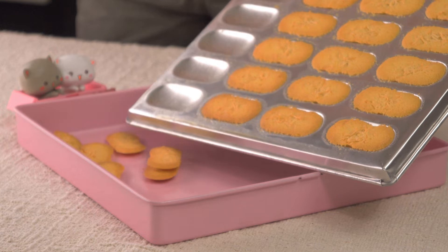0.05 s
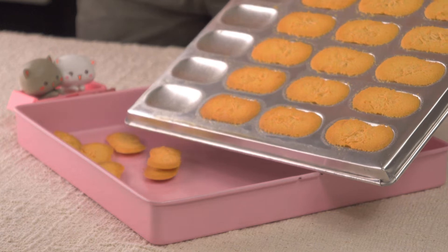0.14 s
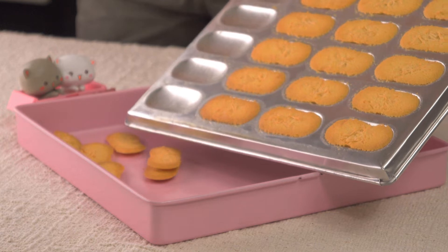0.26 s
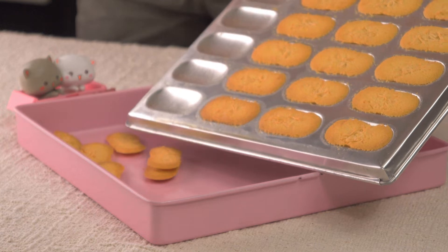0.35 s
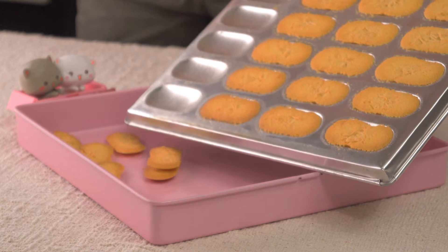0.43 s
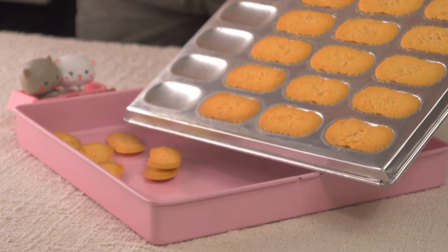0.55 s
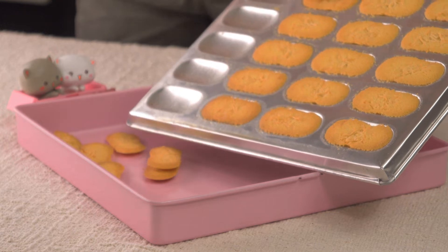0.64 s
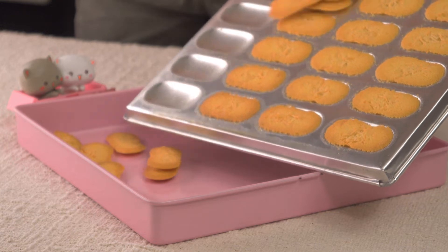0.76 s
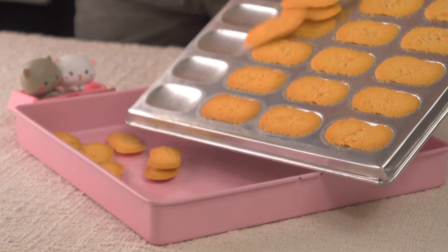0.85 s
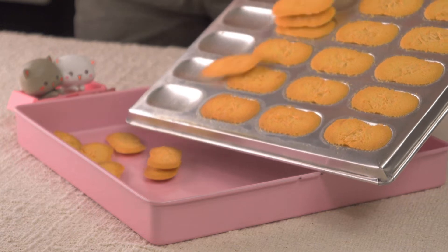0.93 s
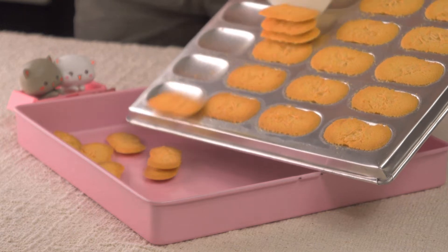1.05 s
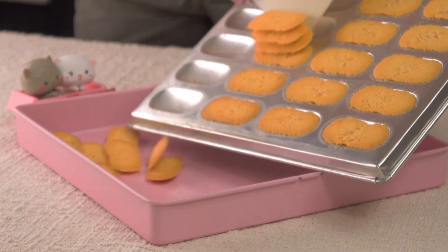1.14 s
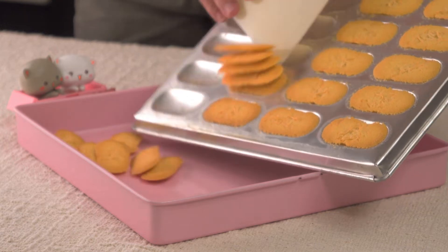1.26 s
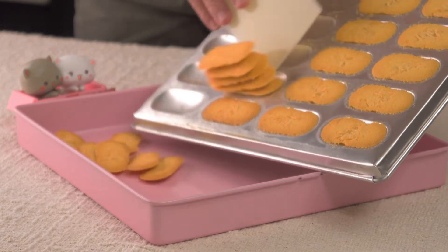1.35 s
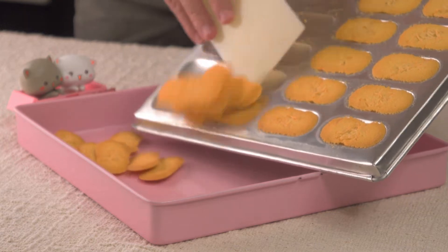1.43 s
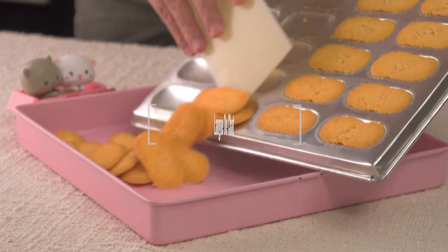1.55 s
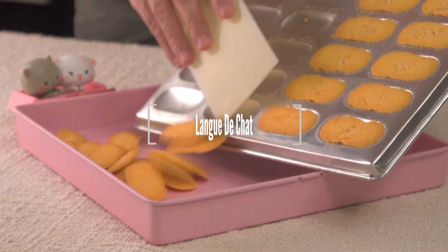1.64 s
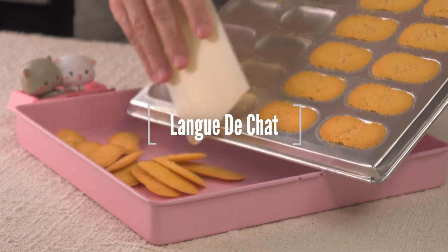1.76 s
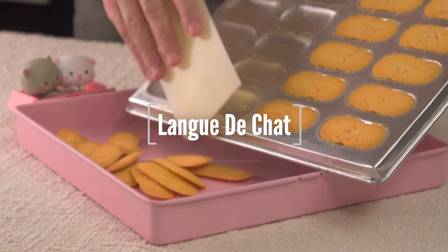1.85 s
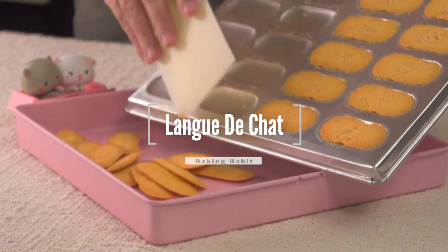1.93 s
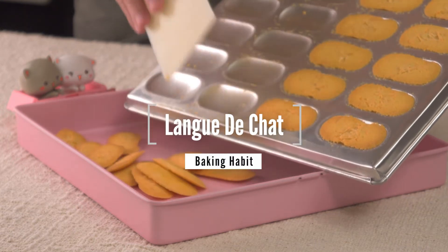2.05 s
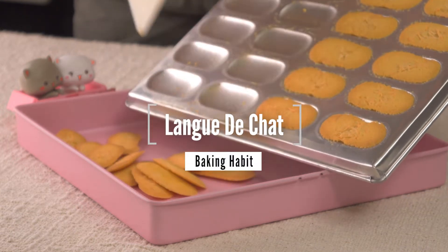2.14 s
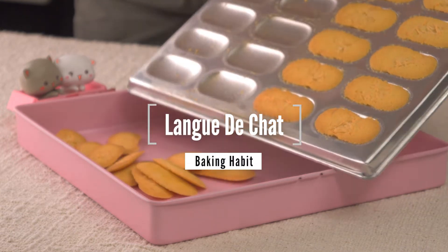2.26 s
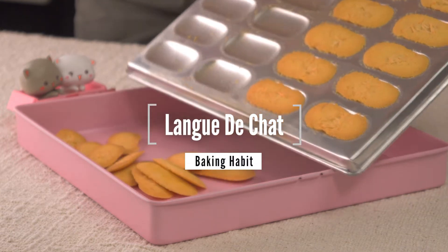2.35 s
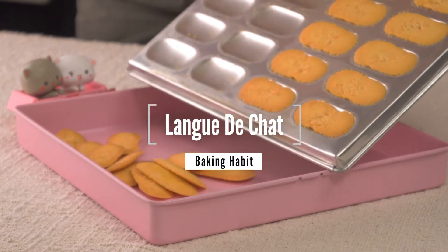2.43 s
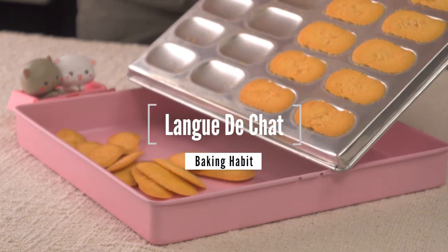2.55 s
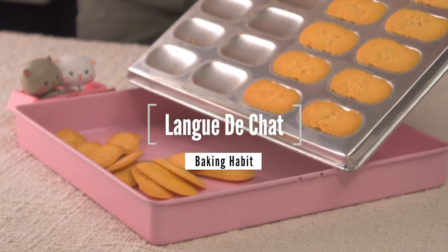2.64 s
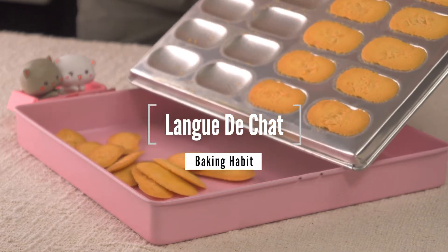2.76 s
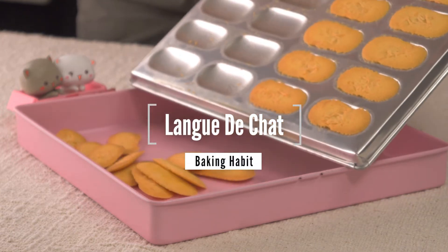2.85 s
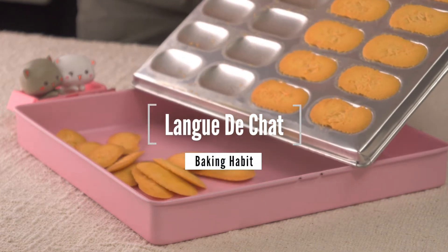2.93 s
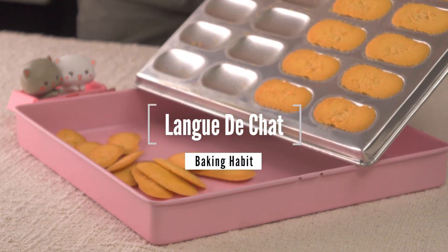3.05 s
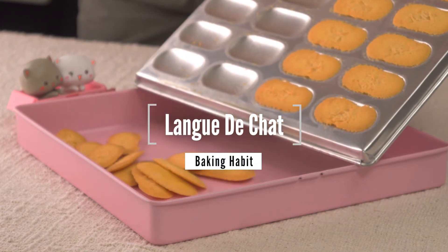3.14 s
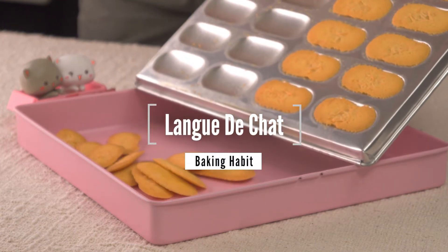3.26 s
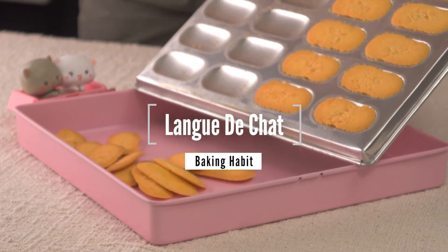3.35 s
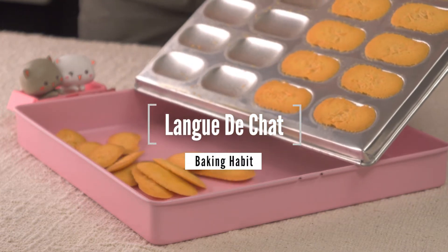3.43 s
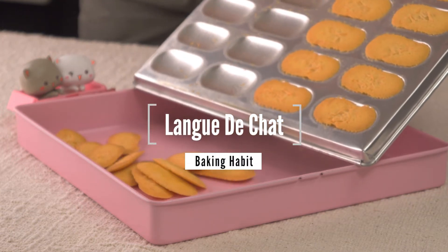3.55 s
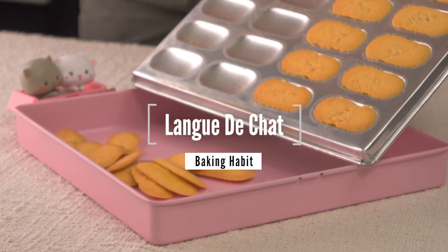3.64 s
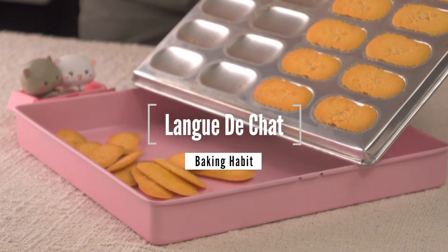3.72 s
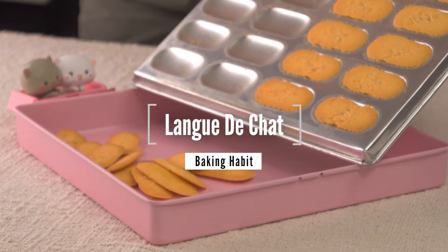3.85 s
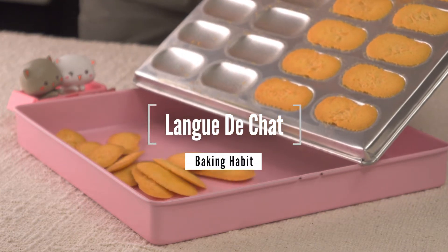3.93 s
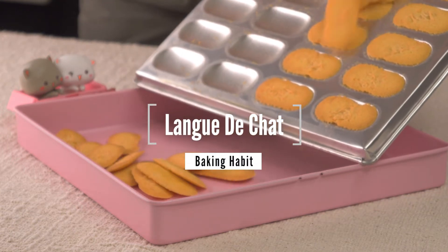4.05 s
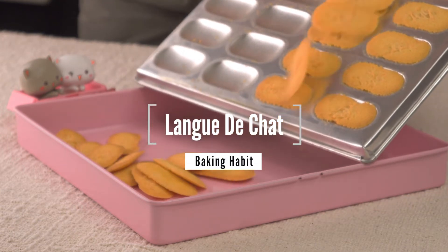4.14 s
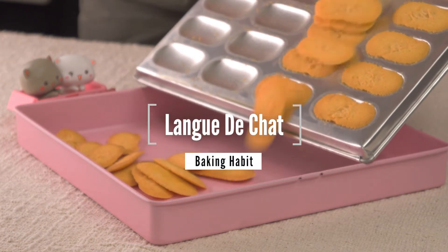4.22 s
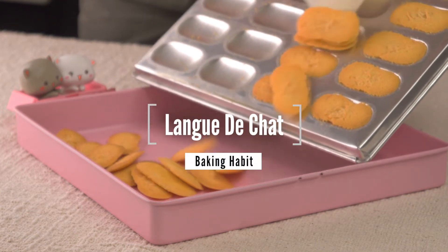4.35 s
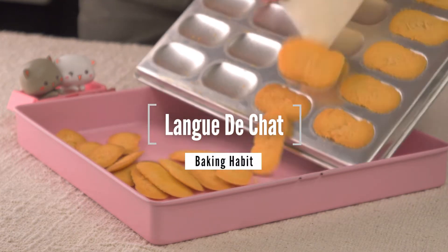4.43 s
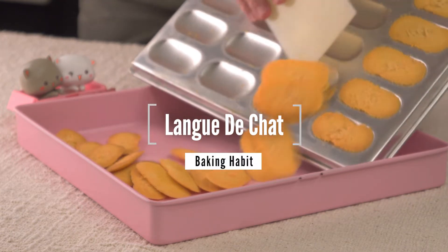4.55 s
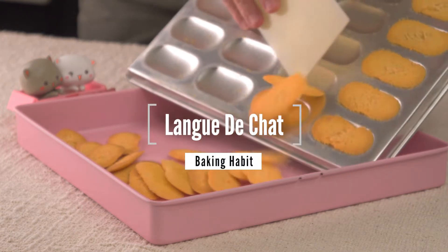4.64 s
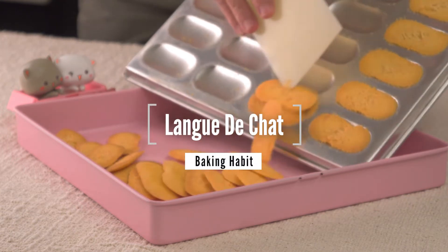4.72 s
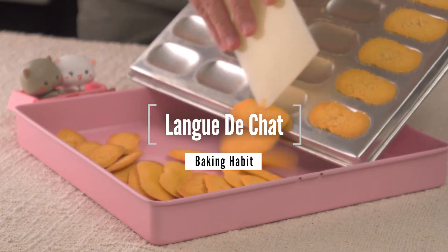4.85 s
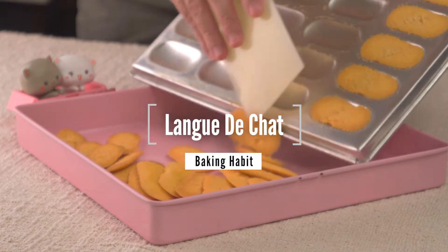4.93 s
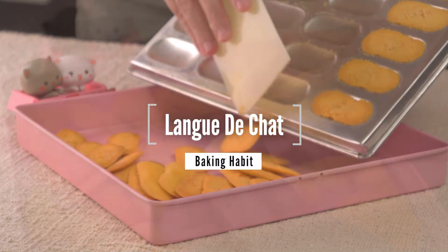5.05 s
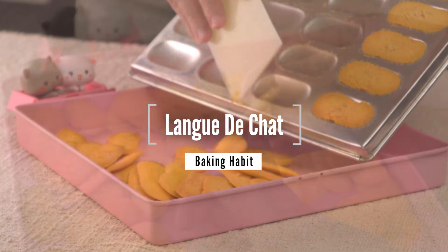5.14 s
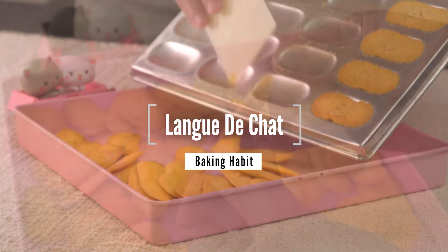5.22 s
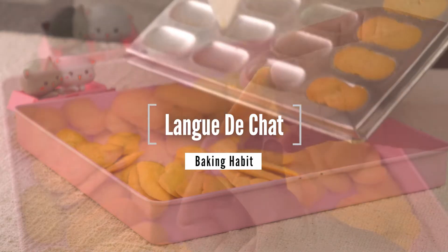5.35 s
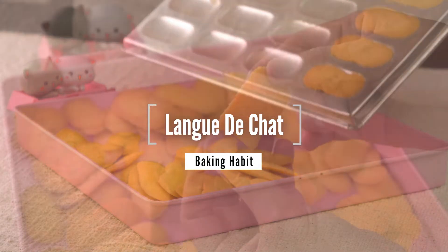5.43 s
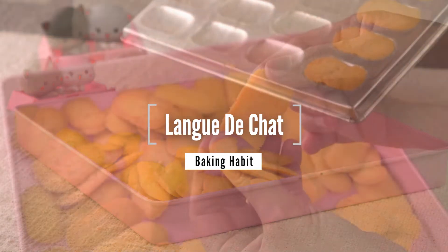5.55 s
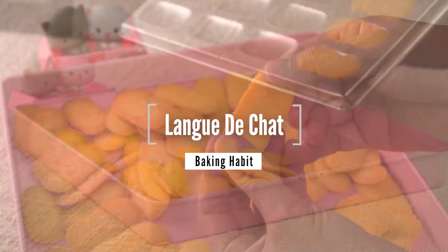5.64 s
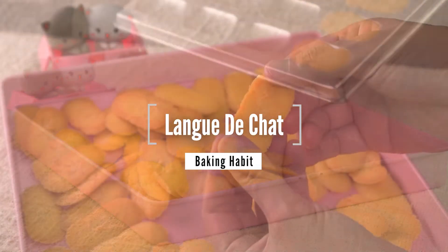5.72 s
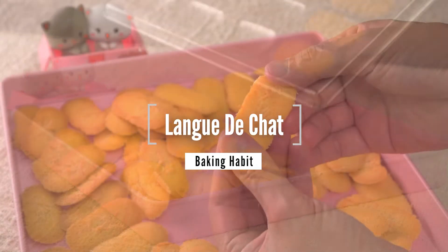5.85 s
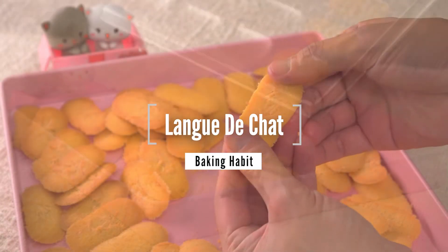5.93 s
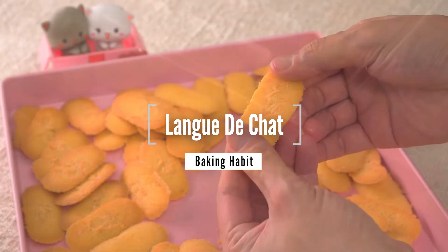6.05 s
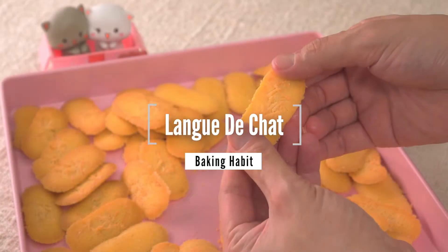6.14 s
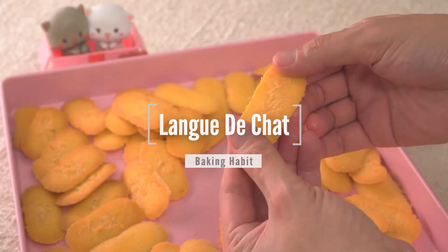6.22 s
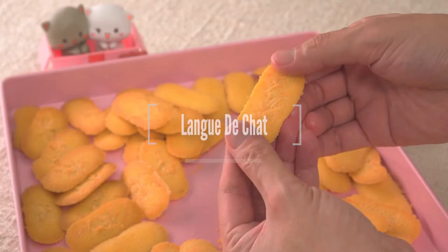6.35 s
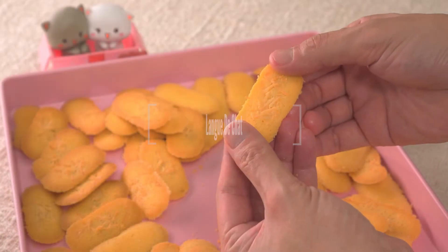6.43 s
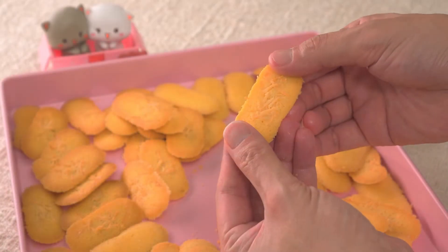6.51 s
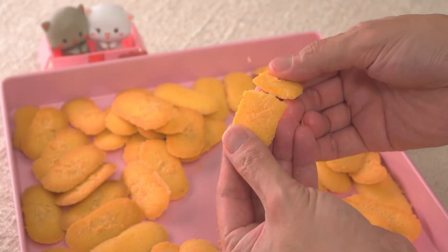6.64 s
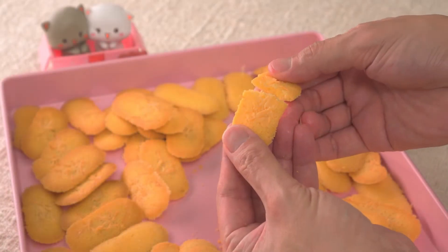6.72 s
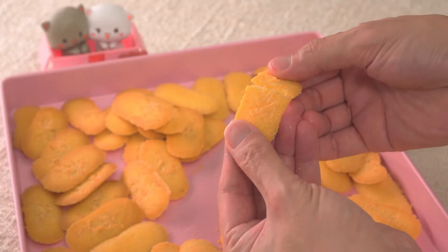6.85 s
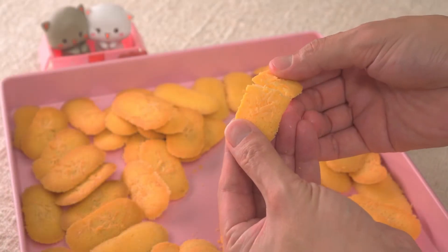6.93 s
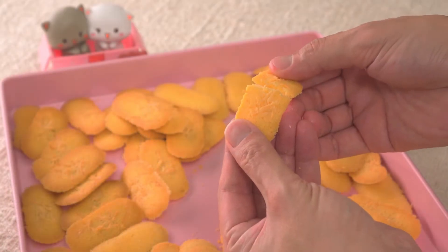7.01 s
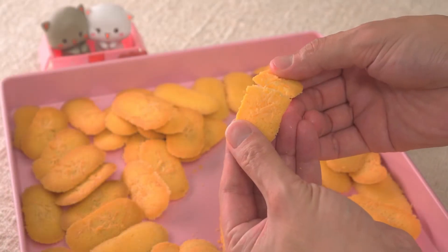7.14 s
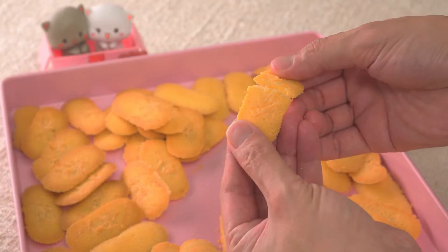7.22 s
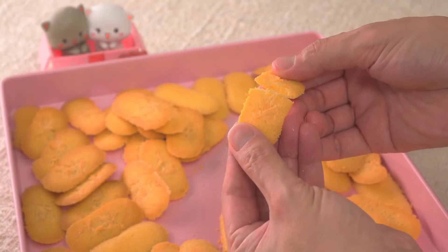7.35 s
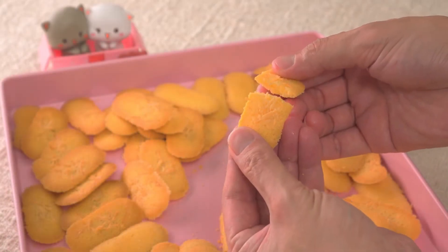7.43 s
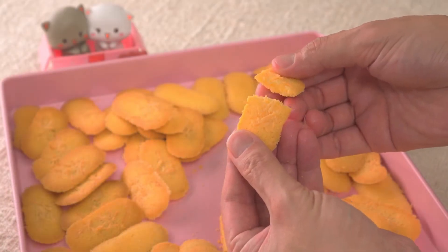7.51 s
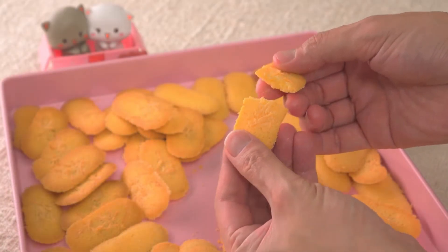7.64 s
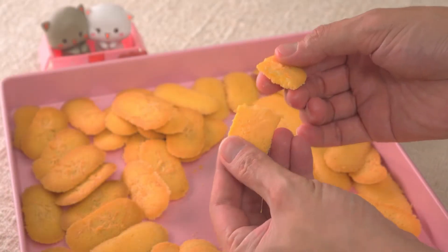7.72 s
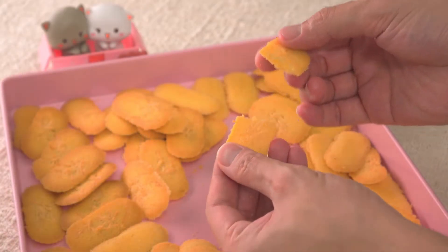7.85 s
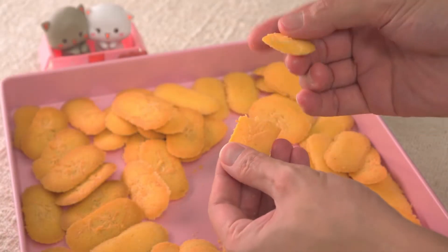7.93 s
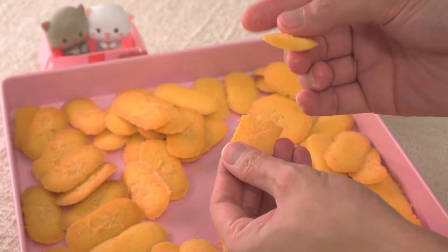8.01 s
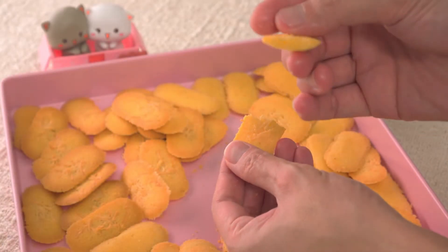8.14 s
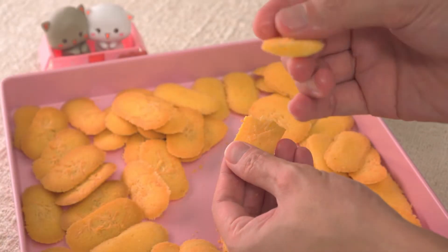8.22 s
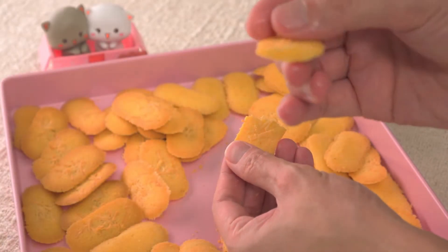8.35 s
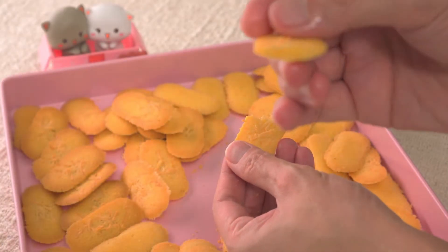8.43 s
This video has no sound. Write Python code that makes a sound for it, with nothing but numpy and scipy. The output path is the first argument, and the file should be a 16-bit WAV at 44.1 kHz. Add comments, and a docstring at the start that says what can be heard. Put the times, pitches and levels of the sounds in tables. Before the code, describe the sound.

A quiet room with soft low noise and a faint mains hum, heard close up. From about 0.1 s a plastic scraper makes light, gritty strokes over crisp cookies in a thin metal mould, with small knocks. The scraping strengthens around 1 s, with a bright clack near 1.1 s, rasping strokes, rattling and soft thuds into a plastic tray, then sharp metallic clacks around 1.7 s. It quiets by 2 s. A short resonant scuff at 2.3 s, a small knock and thud, and two fainter rubs until 3.1 s are the mould shifting on the rim. Scraping resumes near 3.4 s and grows denser from 4 to 5 s, with the hardest clack at 4.35 s and a fuller thud at 4.55 s. Loose ticks settle by 5.3 s. After near silence, a cookie snaps at 6.6 s: a thin, dry, crumbly crack, followed by calm and barely audible crumbs.

```python
"""A plastic scraper rasps over thin baked cookies, pushing them out of a tilted sheet-metal mould in two rounds.
Cookies knock, clack on the ringing metal and thud into a plastic tray; at the end one is snapped in two.
Between the rounds the mould slides on the tray's rim; a low hum and room noise lie beneath.
Rubbing is uneven slips in noise, coloured by spectra and resonances; blows are decaying bursts of
coloured noise, and the metal's ring is noise around its modes. A short room tail answers it all."""
import sys
import numpy as np
from scipy import signal
from scipy.fft import rfft, irfft, next_fast_len
from scipy.io import wavfile
from scipy.ndimage import uniform_filter1d, map_coordinates

SR = 44100
rng = np.random.default_rng(int(sys.argv[2]) if len(sys.argv) > 2 else 0)


def log_audio(samples):
    """Write samples as a 16-bit WAV file to the path given in sys.argv[1]."""
    # one column per channel
    frames = np.atleast_2d(samples).T
    # limit to full scale, then quantise
    limited = np.clip(frames, -1, 1)
    pcm = np.round(limited * 32767).astype(np.int16)
    wavfile.write(sys.argv[1], SR, pcm)


N = 373815
TIME = np.arange(N) / SR  # the whole scene, s
AGE = np.arange(SR // 2) / SR  # time since a contact, s

# spectrum of a hard contact with the metal: (frequency [Hz], level [dB])
CLACK_SPECTRUM = [(500, -37.5), (1200, -11), (2000, -8), (2700, -1.5), (3400, -5), (5000, -8),
                  (6500, -22.5), (10000, -27), (16000, -45.5)]
# spectrum of a dull blow of a cookie: (frequency [Hz], level [dB])
KNOCK_SPECTRUM = [(40, -36.5), (130, -7.5), (260, -13.5), (420, -5), (680, 1.5), (1000, -8), (1600, -17.5),
                  (4000, -57)]
# spectrum of breaking crust: (frequency [Hz], level [dB])
CRUMB_SPECTRUM = [(2000, -38), (5000, -1.5), (7500, 4.5), (10000, -2.5), (12000, -9.5), (16000, -12)]
# strokes of the scraper: (start [s], length [s], level at the bite [dB], crust hiss against the rasp [dB])
STROKES = [(0.154, .03, -49.5, -14), (0.196, 0.18, -33.5, -12), (0.498, 0.18, -46, -6),
           (0.747, 0.19, -44, -7.5), (0.97, 0.18, -31.5, -12.5), (1.179, .12, -29, -13),
           (1.363, 0.1, -31.5, -9.5), (1.547, 0.12, -30, -3.5), (1.697, 0.15, -40, -9.5),
           (3.374, .03, -51, -10.5), (3.413, .17, -42, -8), (3.708, 0.13, -50, -2.5),
           (3.956, 0.1, -43, -2.5), (4.136, 0.21, -35.5, -10), (4.336, 0.18, -39, -8.5),
           (4.541, 0.21, -28, -10.5), (4.748, 0.19, -29, -8), (4.923, 0.08, -36.5, -14.5),
           (5.545, 0.036, -69, 0.5)]

STIR_DB_PER_S = 147  # how quickly the jostling of loose cookies builds up
RUN_OUT_DB_PER_S = 299.5  # release of a stroke


def amp(db):
    """Decibels to gain."""
    return 10 ** (np.asarray(db) / 20)


def unit(x):
    """Scaled to rms 1."""
    return x / np.sqrt(np.mean(x ** 2) + 1e-20)


def impulse(x):
    """Scaled to energy 1."""
    return x / np.linalg.norm(x)


def along(points, hz):
    """(Hz, value) points read on a log frequency axis."""
    point_hz, values = np.transpose(points)
    return np.interp(np.log(hz + 1), np.log(point_hz), values)


def gains(rows):
    """The gain per sample of (s, dB) rows, silent outside them."""
    return amp(np.interp(TIME, *np.transpose(rows), left=-np.inf, right=-np.inf))


def held(start, end, rise, fall):
    """Gain 1 from start to end; it rises before and falls after, in dB per second."""
    before = abs(rise) * np.maximum(start - TIME, 0)
    after = abs(fall) * np.maximum(TIME - end, 0)
    return amp(-np.minimum(before + after, 200))


def fade(t60):
    """A decay of 60 dB in t60 seconds."""
    return np.exp(-np.log(1000) * AGE / t60)


def wobble(rate):
    """A smooth random curve, rate knots a second."""
    knots = rng.standard_normal(int(N * rate / SR) + 4)
    return map_coordinates(knots, [TIME * rate])


def filtered(x, response):
    """x times a response of frequency."""
    size = next_fast_len(len(x) + SR // 4)
    spectrum = rfft(x, size) * response(np.fft.rfftfreq(size, 1 / SR))
    return irfft(spectrum, size)[:len(x)]


def coloured(x, spectrum):
    """x through the causal, minimum-phase filter that has this spectrum."""
    size = 2 ** 12
    level = amp(along(spectrum, np.fft.rfftfreq(size, 1 / SR)))
    cepstrum = irfft(np.log(level))
    # folding the cepstrum forward makes the filter causal
    cepstrum[1:size // 2] *= 2
    cepstrum[size // 2 + 1:] = 0
    return signal.fftconvolve(x, irfft(np.exp(rfft(cepstrum))))[:len(x)]


def patchy(x, depth_db):
    """The colour changes from instant to instant as different crumbs touch."""
    grid = signal.stft(x, nperseg=256)[2]
    across_pitch = uniform_filter1d(rng.standard_normal(grid.shape), size=6, axis=0)
    field = uniform_filter1d(across_pitch, size=5, axis=1)
    return unit(signal.istft(grid * amp(depth_db * unit(field)), nperseg=256)[1][:len(x)])


def gliding(x, glide):
    """The resonances drift in pitch as the rubbing spot moves over the cup."""
    return unit(map_coordinates(x, [np.cumsum(1 + glide * wobble(9))], mode="wrap"))


def friction(rate, spread_db, smooth):
    """Tiny slips of uneven size, on average rate a second, over smooth rubbing noise."""
    slips = (rng.random(N) < rate / SR) * rng.standard_normal(N)
    slips = slips * amp(spread_db * np.clip(rng.standard_normal(N), -2, 2))
    return unit(unit(slips) + smooth * rng.standard_normal(N))


def burst(spectrum, t60, tail_db, tail_t60, colour_db=3):
    """A contact of energy 1, each coloured differently: a short crack and the dense ring of the struck body."""
    envelope = impulse(fade(t60)) + amp(tail_db) * impulse(fade(tail_t60))
    noise = envelope * rng.standard_normal(len(AGE))
    return impulse(patchy(coloured(noise, spectrum), colour_db))


def add(track, s, sound):
    """Mix a sound in at s seconds."""
    part = track[round(s * SR):][:len(sound)]
    part += sound[:len(part)]


def ringing(x, body, size=SR // 4):
    """x through a body that answers a little differently as the contact moves on."""
    out = np.zeros(N)
    for first in range(0, N, size):
        add(out, first / SR, signal.fftconvolve(x[first:first + size], body()))
    return out


def background():
    """Low room noise with a faint mains hum."""
    # spectrum of the room noise: (frequency [Hz], level [dB])
    air_spectrum = [(20, -31), (45, -12), (75, -18), (140, 0.5), (270, -5.5), (580, -10), (900, -22),
                    (1600, -34.5), (4700, -32), (7000, -37), (16000, -40.5)]
    # level of air and hum together: (time [s], level [dB])
    quiet_levels = [(0, -62.5), (3.3, -62.5), (5.3, -60), (6.2, -61), (8.6, -61)]
    air = unit(filtered(rng.standard_normal(N), lambda hz: amp(along(air_spectrum, hz))))
    hum = amp(-7.0) * np.sin(2 * np.pi * 50 * TIME)
    return gains(quiet_levels) * (air + hum)


def kitchen(x):
    """The room's answer, a tail of decaying noise; the treble dies first."""
    # reverberation of the room: (frequency [Hz], time to decay by 60 dB [s])
    room_decay = [(150, 0.51), (3000, 0.1), (12000, 0.085)]
    hz, t, grid = signal.stft(rng.standard_normal(SR // 2), SR, nperseg=256)
    decay = np.exp(-np.log(1000) * t / along(room_decay, hz)[:, None])
    tail = signal.istft(grid * decay, SR, nperseg=256)[1]
    delay = round(.006 * SR)
    return signal.fftconvolve(x, np.pad(impulse(tail), (delay, 0)))[:N]


def slide():
    """The mould's edge chatters along the tray's rim, which resonates over a broad, soft rasp."""
    # resonances of the rubbed rim: (frequency [Hz], width [Hz], level [dB])
    rim_modes = [(372, 86, 12.5), (676, 63, 14), (1295, 34, 8), (2664, 97, -1), (4530, 160, 0),
                 (7400, 1200, -14)]
    # slides of the mould: (start [s], end [s], level [dB])
    slide_moves = [(2.317, 2.341, -47.5), (2.62, 2.766, -56.5), (2.936, 3.075, -56.5)]
    dull_hz, rasp_db, top_hz = 900, -13, 8300

    def rim(f):
        response = 0
        for k, (hz, width, db) in enumerate(rim_modes):
            mode = 1j * f * width / (hz * hz - f * f + 1j * f * width)
            response = response + (-1) ** k * amp(db) * mode  # alternating polarity
        return response

    rub = unit(filtered(friction(rate=450, spread_db=-6, smooth=0.93), rim))
    rasp = unit(filtered(rng.standard_normal(N), lambda f: 1 / (1 + 1j * f / dull_hz)))
    motion = sum(amp(db) * held(start, end, rise=77, fall=220) for start, end, db in slide_moves)
    chatter = amp(1.5 * wobble(40)) * (rub + amp(rasp_db) * rasp)
    return motion * unit(filtered(chatter, lambda f: 1 / np.sqrt(1 + (f / top_hz) ** 4)))


def snap():
    """One thin dry crack, then the fracture runs through the crumb in steps and the two halves spring apart."""
    # steps of the break and its last crumbs: (time [s], relative level [dB], time to decay by 60 dB [s])
    fractures = [(6.582, -24.5, 0.01), (6.598, -35, 0.025), (6.604, -33, 0.026), (6.61, -23, 0.048),
                 (6.619, -57, 0.067), (6.972, -60, 0.0078), (7.679, -65, 0.012)]
    # spectrum of the cracking: (frequency [Hz], level [dB])
    break_spectrum = [(700, -39.5), (1500, -35), (2400, -8.5), (4200, 3), (6300, -0.5), (9000, -4),
                      (16000, -10.5)]
    # spectrum of the halves springing apart: (frequency [Hz], level [dB])
    halves_spectrum = [(300, -35), (650, 11.5), (1300, -14), (1900, 0), (4000, -33)]
    out = np.zeros(N)
    for s, db, t60 in fractures:
        crack = burst(break_spectrum, t60, tail_db=-20.5, tail_t60=0.17, colour_db=5)
        add(out, s, amp(db + 20.0) * crack)
    add(out, 6.61, amp(-19) * burst(halves_spectrum, t60=0.046, tail_db=-22, tail_t60=.1))
    return out


def tumbles():
    """Soft blows: cookies flop in the cups with one short push, and thud on the tray's floor."""
    # cookies tumbling in the cups: (time [s], relative level [dB], pitch [Hz])
    cup_knocks = [(.36, -16.5, 646), (.524, -30.5, 720), (.941, -28, 800), (1.167, -25, 800),
                  (3.592, -26, 510), (3.609, -37, 467), (3.685, -32, 527), (3.711, -28, 462),
                  (4.667, -25.5, 670), (4.894, -29, 613), (5.313, -44, 613), (5.547, -49.5, 584)]
    # cookies landing in the tray: (time [s], relative level [dB])
    tray_thuds = [(1.208, -45), (1.541, -31), (1.568, -30), (2.452, -37), (4.306, -30.5), (4.521, -29),
                  (4.553, -20.5), (4.738, -30), (5.06, -37.5)]
    # spectrum of a landing: (frequency [Hz], level [dB])
    thud_spectrum = [(25, -19), (70, -20.5), (115, 0.5), (180, 0), (330, 1), (600, -9.5), (1500, -37)]
    out = np.zeros(N)
    lead = .003  # the push starts this early, s
    for s, db, hz in cup_knocks:
        cycles = hz * (AGE - lead)
        push = np.exp(-(cycles / 0.93) ** 2) * np.sin(2 * np.pi * cycles)
        add(out, s - lead, amp(db + 20) * impulse(push))
        add(out, s, amp(db + 17) * burst(KNOCK_SPECTRUM, t60=0.11, tail_db=-7, tail_t60=0.074))
    for s, db in tray_thuds:
        add(out, s, amp(db + 22) * burst(thud_spectrum, t60=.05, tail_db=4.5, tail_t60=.16))
    return out


def cookie(t60):
    """The brief, dense ring of one cookie in its cup."""
    return impulse(fade(t60) * rng.standard_normal(len(AGE)))


def swishes():
    """After each longer bite the cookie glides on its smooth underside: narrow, drifting treble resonances."""
    # spectrum of the glide: (frequency [Hz], level [dB])
    swish_spectrum = [(3000, -27), (5800, -7.5), (7000, -3), (8700, -2.5), (10000, -5), (12000, -23),
                      (16000, -29.5)]
    delay_s, length_s, level_db = .088, 0.074, -50.5  # from bite to middle of the glide; its length; level
    grain = signal.fftconvolve(rng.standard_normal(N), cookie(t60=0.019))[:N]
    swish = unit(coloured(gliding(grain, glide=0.053), swish_spectrum))
    # a brief touch frees no cookie
    middles = [start + delay_s for start, length, *_ in STROKES if length > delay_s]
    speed = sum(np.cos(np.pi * np.clip((TIME - s) / length_s, -.5, .5)) for s in middles)
    return amp(level_db) * speed * swish


def ring():
    """The many alike cups split each mode into a close cluster over a weak bed; the hand damps most quickly."""
    # modes of the sheet metal: (frequency [Hz], level [dB])
    mould_modes = [(655, 1), (786, -10), (1910, -15), (2115, -5), (2570, 5.5), (2750, -4.5), (2920, -7),
                   (3025, -12), (3320, -0.5), (3550, -9.5), (3900, -9)]
    width_hz = 40  # of each cluster

    def sheet(f):
        power = sum(amp(db) ** 2 / (1 + (2 * (f - hz) / width_hz) ** 2) for hz, db in mould_modes)
        return np.sqrt(power) + amp(-11.0 + along(CLACK_SPECTRUM, f))

    decay = fade(t60=0.069) + amp(-17) * fade(t60=0.8)
    return impulse(filtered(rng.standard_normal(len(AGE)), sheet) * decay)


def clacks():
    """Hard contacts crack, thump, crush crust and leave the metal ringing; crust cracks are mostly crumbs."""
    # hard contacts with the mould: (time [s], relative clack level [dB], relative knock level [dB])
    hard_contacts = [(.133, -44, -45), (.169, -25, -38.5), (0.4643, -30, -34), (0.7843, -24, -25),
                     (.8767, -23.5, -27), (0.9766, -18, -22.5), (1.0171, -21.5, -30.5), (1.037, -25.5, -34),
                     (1.09, -11.5, -40), (1.1767, -25, -23.5), (1.647, -19, -28.5), (1.71, -16, -26),
                     (1.7453, -11, -26), (2.4538, -29, -29), (3.361, -38, -56), (3.4183, -22, -27.5),
                     (3.9572, -24.5, -31), (4.068, -23.5, -22.5), (4.095, -26, -22.5),
                     (4.118, -21.5, -22.5), (4.1589, -20.5, -34), (4.3039, -18.5, -16),
                     (4.3255, -18.5, -28), (4.3546, -6.5, -28.5), (4.3628, -10, -35), (4.4973, -18, -23.5),
                     (4.6453, -17.5, -21.5), (4.7397, -16, -29), (4.9441, -20.5, -33), (4.9841, -25.5, -37),
                     (5.1411, -25, -39.5), (5.228, -28.5, -41.5)]
    # crust cracking loose from a cup: (time [s], relative level [dB])
    crust_cracks = [(.5903, -27.5), (.672, -38.5), (1.505, -35), (1.5186, -27), (2.051, -61), (3.4458, -36),
                    (3.9563, -33.5), (4.237, -25), (4.5399, -29.5), (4.899, -32.5), (4.92, -36.5),
                    (5.545, -56)]
    crush_db, crack_clack_db = -20, -1.5  # crushed crust against the clack; the metal's answer to a crack
    onset_s, onset_db = 0.0045, -19  # a faint, short lead-in softens the onset of each clack
    out = np.zeros(N)

    def clack():
        return burst(CLACK_SPECTRUM, t60=0.017, tail_db=-8.5, tail_t60=.13)

    def crumb():
        return amp(20) * burst(CRUMB_SPECTRUM, t60=0.018, tail_db=-16.0, tail_t60=0.044)

    for s, db, knock_db in hard_contacts:
        ring_db = 18.5 + 1.336 * db  # harder blows reach deeper into the metal
        add(out, s, amp(db + 13.5) * clack() + amp(ring_db) * ring() + amp(db + crush_db) * crumb())
        add(out, s - onset_s, amp(db + onset_db + 12) * clack())
        add(out, s, amp(knock_db + 23) * burst(KNOCK_SPECTRUM, t60=0.039, tail_db=0, tail_t60=0.13))
    for s, db in crust_cracks:
        add(out, s, amp(db) * (crumb() + amp(crack_clack_db + 13.5) * clack()))
    return out


def rattling(jostle):
    """Loose cookies tick on the metal while they are jostled, and once more as they come to rest."""
    settle_s, rest_s, settle_db = 5.0, 5.26, -45.5  # the last rattle: start, end, level
    touches = friction(rate=80, spread_db=0.5, smooth=.1)
    ticks = ringing(patchy(coloured(touches, CLACK_SPECTRUM), depth_db=3), lambda: cookie(t60=.035))
    crumbs = ringing(unit(coloured(touches, CRUMB_SPECTRUM)), lambda: cookie(t60=.015))
    # the two slopes multiply: a doubly steep rise, a gradual fade, then a quick end
    settling = amp(settle_db) * held(settle_s, settle_s, STIR_DB_PER_S, fall=53)
    settling = settling * held(settle_s, rest_s, STIR_DB_PER_S, RUN_OUT_DB_PER_S)
    return (amp(-12) * jostle + settling) * (ticks + amp(-16.5) * crumbs)


def pressure(start, length, db):
    """The force of one stroke: it bites, relaxes as the cookie gives way, and runs out."""
    glide_db, relax_s = -51, 0.16  # a harder stroke relaxes towards this level; time constant
    relaxed = 1 - np.exp(-np.maximum(TIME - start, 0) / relax_s)
    level = amp(db - max(db - glide_db, 0) * relaxed)
    return level * held(start, start + length, 895.5, RUN_OUT_DB_PER_S)


def scraper():
    """Crust sticks and slips on metal: it rasps and hisses with the force; cookies rattle, the sheet rumbles."""
    # spectrum of the rasp: (frequency [Hz], level [dB])
    rasp_spectrum = [(400, -20.5), (1100, 1), (1800, -1), (4700, 1.5), (6000, -9.5), (10000, -31.5),
                     (16000, -46)]
    # spectrum of the crust's hiss: (frequency [Hz], level [dB])
    hiss_spectrum = [(3000, -28.5), (6500, 3), (9000, -2.5), (11000, -5.5), (16000, -7.5)]
    # spectrum of the sheet's rumble: (frequency [Hz], level [dB])
    rumble_spectrum = [(25, -41.5), (80, -26), (120, -4.5), (260, -6), (380, 2.5), (680, 5), (950, -4.5),
                       (1400, -16.5), (3000, -42)]
    # rounds that jostle loose cookies: (start [s], end [s], rumble level [dB], settling [dB per s])
    push_rounds = [(0.41, 1.818, -42.5, 123), (3.65, 4.953, -45, 43)]
    dull_hz, bright_db = 2600, 6.5  # above this the rasp comes from rough crust, like the hiss
    flex_db = -5.5  # rumble of the flexing sheet, against the rasp

    grip = amp(0.48 * wobble(70))
    slips = friction(rate=220, spread_db=4, smooth=.9)
    crumbs = friction(rate=300, spread_db=5, smooth=.9)
    rasp = patchy(gliding(coloured(slips, rasp_spectrum), glide=.03), depth_db=3.5)
    hiss = patchy(coloured(crumbs, hiss_spectrum), depth_db=3)

    force, crust = np.zeros(N), np.zeros(N)
    for start, length, db, hiss_db in STROKES:
        stroke = pressure(start, length, db)
        force = np.maximum(force, stroke)
        crust = np.maximum(crust, amp(hiss_db) * stroke)
    jostle = sum(amp(db) * held(start, end, STIR_DB_PER_S, settling)
                 for start, end, db, settling in push_rounds)

    dull = filtered(rasp, lambda f: 1 / (1 + (f / dull_hz) ** 4))
    rub = force * dull + crust * (hiss + amp(bright_db) * (rasp - dull))
    rub = (rub + ringing(rub, lambda: cookie(t60=0.044))) / np.sqrt(2)
    rattle = rattling(jostle)
    singing = amp(-17.5) * ringing(rub + rattle, ring)  # the metal sings along
    flexing = friction(rate=220, spread_db=4.5, smooth=0.78)
    rumble = patchy(coloured(flexing, rumble_spectrum), depth_db=1)
    rumble = np.hypot(jostle, amp(flex_db) * force) * rumble
    return grip * (rub + rattle + singing + rumble)


def scene():
    """Work at the mould, then the snap close to the microphone, with less of the room."""
    work = scraper() + swishes() + clacks() + tumbles() + slide()
    crack = snap()
    room = kitchen(amp(-13.5) * work + amp(-23.5) * crack)
    return (work + crack + room + background())[None]


def record(dry):
    """A very steep low-pass: next to nothing is kept above the band limit."""
    top_hz = 16000
    return filtered(dry[0], lambda hz: 1 / np.sqrt(1 + (hz / top_hz) ** 200))[None]


dry = scene()
out = record(dry)
log_audio(out)
```